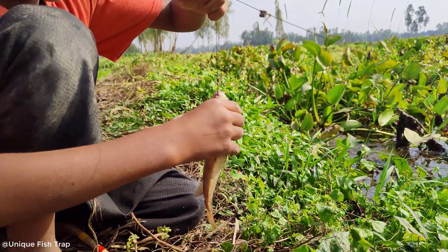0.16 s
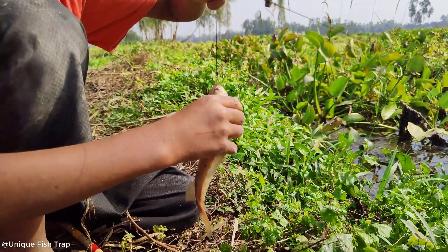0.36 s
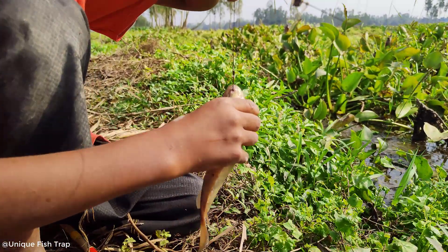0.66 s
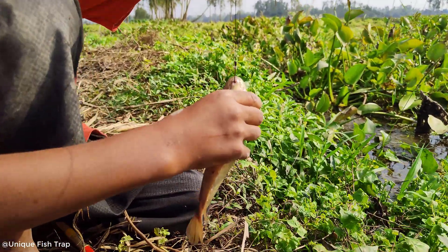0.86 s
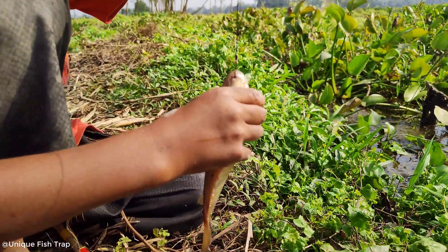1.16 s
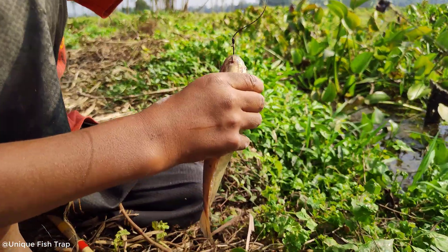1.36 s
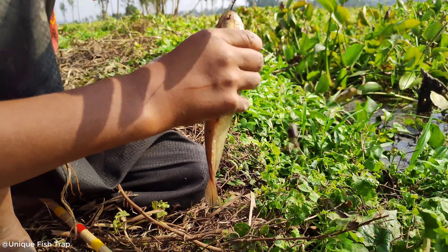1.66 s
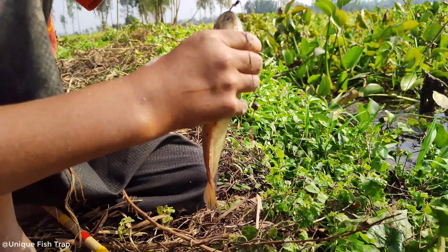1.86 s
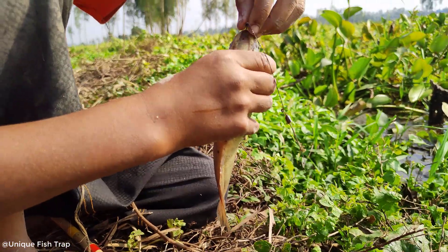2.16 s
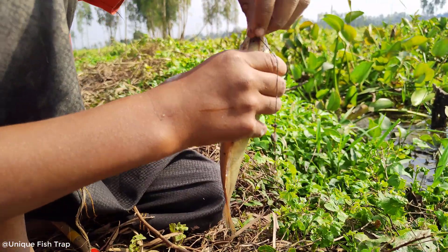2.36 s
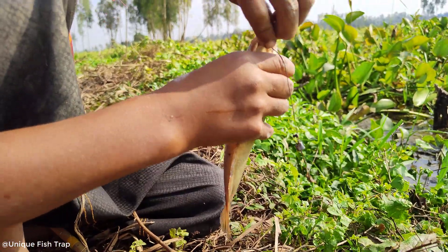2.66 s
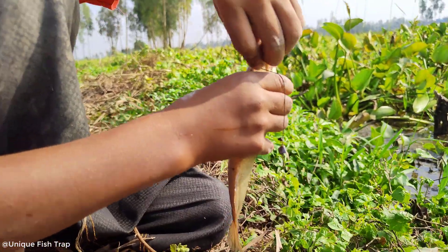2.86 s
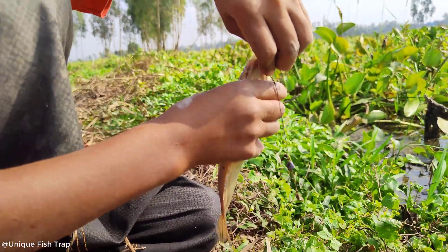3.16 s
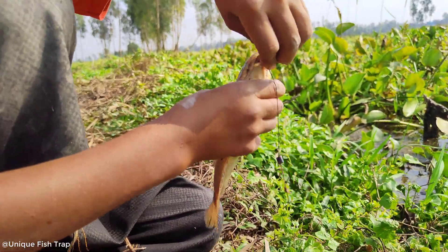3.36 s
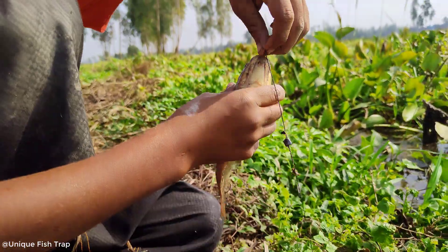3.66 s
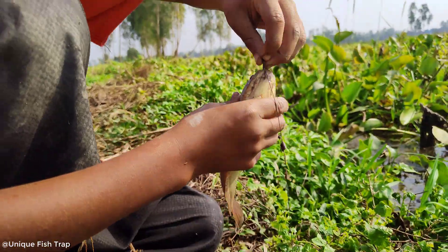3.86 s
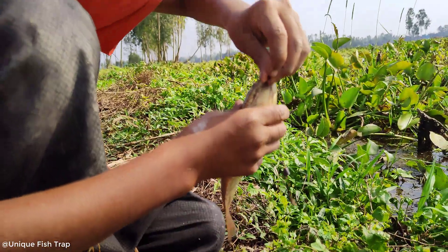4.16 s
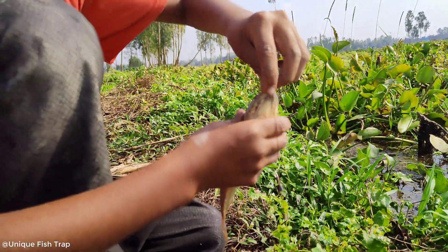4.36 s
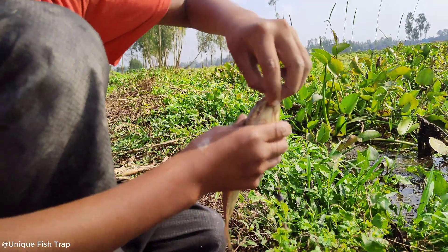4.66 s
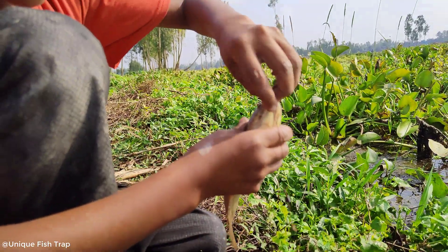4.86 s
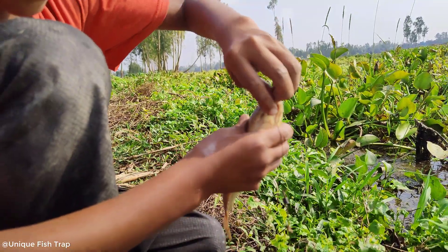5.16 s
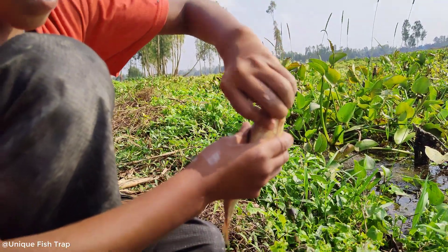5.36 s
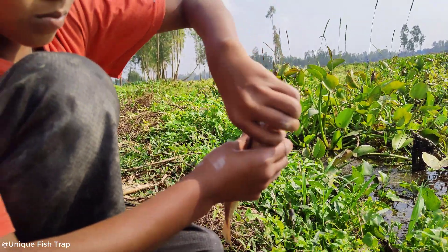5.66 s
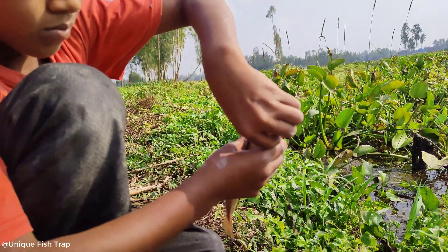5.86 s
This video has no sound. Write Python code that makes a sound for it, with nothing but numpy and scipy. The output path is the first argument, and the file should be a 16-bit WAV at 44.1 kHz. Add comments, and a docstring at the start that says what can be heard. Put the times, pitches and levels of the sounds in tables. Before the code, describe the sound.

A quiet, open marshy field with a low soft rumble, a faint wavering far motor, airy hush and a high insect buzz leaning left, its pulsing clearest around 4.5 s. Faint leaves and tiny gliding bird chirps are busiest in the first 1.4 s, with a soft whistle near 0.5 s. Up close, fingers handle a wet fish: a dull scuff at 0.4 s, light ticks at 0.4 to 0.8 s, a quick crackling rub at 1.45 s, then a wet squeaky slip at 1.9 s. Small ticks and knocks follow at 2.2 to 2.9 s, with a soft low thud at 2.5 s and a fainter one at 4 s. From 3.3 s a distant thin cluster of pulsing tones swells in hazy noise, fading after 4.2 s to weak single tones until about 5.3 s. A tick at 5.45 s precedes one sharp, dry, loud snap at 5.72 s and a tiny wet squeak.

```python
"""Hands work a hook out of a small fish at the weedy edge of a marsh: wet ticks, rustles, bumps and one sharp snap.
Ticks, knocks and squeaks are short rings, thuds are low damped rings, rubbing is flickering noise with tiny pops.
Behind lie a low noise rumble, a far motor of wavering tones, a pulsing band of insect noise and faint gliding chirps.
A thin whine of several pulsing tones, in a haze of noise, swells and fades in the distance."""
import sys
import numpy as np
from scipy import signal
from scipy.io import wavfile

SR = 44100
rng = np.random.default_rng(int(sys.argv[2]) if len(sys.argv) > 2 else 0)


def store_pcm(level_fs):
    """Save levels as 16-bit WAV."""
    pcm = np.round(np.clip(level_fs, -1, 1) * 32767).astype(np.int16)
    wavfile.write(sys.argv[1], SR, np.atleast_2d(pcm).T)


N = 264159
TIME = np.arange(N) / SR  # seconds

# How strongly the leaves stir; the far bird chatter follows the same curve.
# Each row: time in seconds, level in dB.
STIR = [(0, -66.5), (.2, -70.5), (.45, -64), (1.35, -70.5), (1.65, -73), (3.15, -74.5), (3.5, -72),
        (4.35, -71), (4.75, -71), (6, -73.5)]


def from_db(db):
    """Turn decibels into a gain."""
    return 10 ** (np.asarray(db) / 20)


def rms_one(x):
    """Scale a signal to an average strength (rms) of 1."""
    return x / np.sqrt(np.mean(x ** 2) + 1e-20)


def in_time(rows):
    """Draw each column of a table as a curve with a value at every sample."""
    seconds, *columns = np.transpose(rows)
    return [np.interp(TIME, seconds, column) for column in columns]


def at_hz(points, hz):
    """Read a value between the points of a spectrum, along a log-frequency axis."""
    point_hz, values = np.transpose(points)
    return np.interp(np.log(hz), np.log(point_hz), values)


def pan(db):
    """Left and right gains for a left-minus-right difference in dB, with a mean power of 1."""
    return rms_one(from_db(np.array([[db], [-db]]) / 2))


def drift(rate_hz):
    """Smooth random wandering of rms 1: noise through a double low-pass, made at every 40th sample."""
    step = 40
    r = np.exp(-2 * np.pi * rate_hz * step / SR)
    white = rng.standard_normal(N // step + 2002)
    slow = signal.lfilter([1], [1, -2 * r, r * r], white)[2000:]  # drop the filter's start-up
    return np.interp(np.arange(N) / step, np.arange(len(slow)), rms_one(slow))


def ring(clicks, hz, t60):
    """A resonance: each unit click starts a sine of height 1 that fades by 60 dB in t60 seconds."""
    r = np.exp(-np.log(1000) / (t60 * SR))
    w = 2 * np.pi * hz / SR
    return signal.lfilter([0, np.sin(w)], [1, -2 * r * np.cos(w), r * r], clicks + 1e-18)


def struck_rings(rows):
    """Strike one resonance per row: start in seconds, level in dB, pitch in Hz, 60 dB fade in seconds."""
    return sum(from_db(db) * ring(signal.unit_impulse(N, int(start * SR)), hz, t60)
               for start, db, hz, t60 in rows)


def held(start, length, attack, release):
    """An envelope of height 1 that builds up, holds and lets go exponentially; all in seconds."""
    before = np.maximum(start - TIME, 0) / attack
    after = np.maximum(TIME - start - length, 0) / release
    return np.exp(-np.minimum(before + after, 20))


def narrow_noise(hz, width_hz):
    """Stereo noise of rms 1 around one pitch, which may move: slow noise rides on a spinning carrier."""
    white = rng.standard_normal((2, N)) + 1j * rng.standard_normal((2, N))
    slow = signal.sosfilt(signal.butter(2, width_hz / 2, fs=SR, output="sos"), white)
    carrier = np.exp(2j * np.pi * np.cumsum(hz * np.ones(N)) / SR)
    return rms_one(np.real(slow * carrier))


def banded_noise(spectrum, patchy_db, count):
    """Stereo noise of rms 1 built from bands, each with its own level, flicker and left-right likeness."""
    # How alike the two ears' noise is. Each row: frequency in Hz, likeness from -1 to 1.
    likeness = [(60, 0.86), (130, 1), (290, 0.61), (640, -0.01), (1400, -0.091), (3100, 0.046),
                (7000, -0.3), (15000, 0.23)]
    edges = np.geomspace(spectrum[0][0], min(spectrum[-1][0], SR / 2 - 1), count + 1)
    white = rng.standard_normal((2, 2, N))
    out = 0
    for k, (low, high) in enumerate(zip(edges, edges[1:])):
        band = signal.butter(3, [low, high], "band", fs=SR, output="sos")
        mid, side = signal.sosfilt(band, white[k % 2])  # neighbours use different noise
        hz = np.sqrt(low * high)
        alike = np.clip(at_hz(likeness, hz), -1, 1)
        stereo = np.sqrt(1 + alike) * mid + np.sqrt(1 - alike) * side * [[1], [-1]]
        out = out + from_db(at_hz(spectrum, hz) + patchy_db * drift(13.9)) * stereo
    return rms_one(out)


def field_echoes(x, t60, count=60):
    """Sparse, fading reflections from ground and plants, different in each ear."""
    out = np.zeros((2, N))
    for side in range(2):
        delays = rng.uniform(0.001434, .04, count)  # seconds
        for delay, size in zip(delays, rng.normal(0, 1, count)):
            lag = int(delay * SR) + 1
            fade = np.exp(-np.log(1000) * delay / t60)
            out[side, lag:] += size * fade * x[side, :-lag]
    return out / np.sqrt(count)


def distance():
    """Low noise rumbles, wavering sines make a far motor, and soft noise makes the hush of open air."""
    # Spectrum of the rumble. Each row: frequency in Hz, relative level in dB per Hz.
    rumble_spectrum = [(13, -6), (22, 0), (59, 2.5), (125, -2.5), (146, 0.5), (221, -1.5), (241, -2),
                       (257, -16.5), (309, -12), (354, -21.5), (425, -20.5), (657, -36.5), (903, -34.5),
                       (1200, -62), (1560, -74), (2640, -120)]
    # Spectrum of the air. Each row: frequency in Hz, relative level in dB per Hz.
    air_spectrum = [(500, -5), (900, 4.5), (1300, -8), (1900, -1.5), (2800, 0.5), (3600, -6), (4600, -17.5),
                    (5600, -14), (7000, -16.5), (9000, -46), (12000, -47), (15000, -52)]
    # Tones of the far motor. Each row: middle pitch in Hz, middle rms level in dB.
    motor_tones = [(76, -61.5), (106, -64), (231, -64), (279, -68.5)]
    out = from_db(-49.5) * banded_noise(rumble_spectrum, patchy_db=2.5, count=18)
    out = out + from_db(-71) * banded_noise(air_spectrum, patchy_db=2, count=14)
    for hz, db in motor_tones:
        loudness = from_db(db + 3.3 * drift(1.6)) * np.sqrt(2)
        phase = 2 * np.pi * np.cumsum(hz + 2.042 * drift(3.57)) / SR
        out = out + loudness * np.sin(phase)
    return out


def insects():
    """A chorus of noise bands, and one nearer insect rasping in slightly uneven pulses that slide in pitch."""
    # The nearest insect. Each row: time in seconds, middle pitch in Hz, level in dB, pulse depth from 0 to 1.
    rasp_curve = [(0, 8550, -76, 0.15), (1.6, 8250, -72.5, 0.18), (2.9, 8010, -76.5, 0.3),
                  (4.0, 8050, -77, .55), (4.6, 8250, -72, .8), (5.05, 7700, -74, .7), (6, 7790, -79, .3)]
    # Spectrum of the chorus. Each row: frequency in Hz, relative level in dB per Hz.
    chorus_spectrum = [(6200, -24), (7000, -10.5), (7400, 1.5), (7750, 3), (8200, -8), (8700, -7.5),
                       (9400, -43)]
    pulses_per_s, width_hz, swing_hz = 14, 500, 140
    hz, level_db, depth = in_time(rasp_curve)
    turn = 2 * np.pi * np.cumsum(pulses_per_s * (1 + 0.076 * drift(4.7))) / SR
    pulses = rms_one(1 + depth * np.sin(turn))
    sliding_hz = hz - swing_hz * depth * np.cos(turn)
    near = from_db(level_db) * pulses * narrow_noise(sliding_hz, width_hz)
    chorus = from_db(-72.5) * banded_noise(chorus_spectrum, patchy_db=4, count=9)
    return near * pan(-9) + chorus * pan(-6)


def chatter(count=480):
    """Many tiny far chirps: short sines at random times, pitches and glides; rms 1 in all."""
    out = np.zeros(N)
    starts, lengths = rng.random(count), rng.uniform(0.02, 0.067, count)
    for when, length, (pitch, glide, loud) in zip(starts, lengths, rng.standard_normal((count, 3))):
        on = slice(int(when * N), int(when * N + length * SR))
        t = TIME[on] - TIME[on][0]
        hz = 3350 * 2 ** (.45 * np.tanh(pitch / 2)) + 4000 * glide * t
        fade = np.sin(np.pi * t / length)
        out[on] += from_db(2 * loud) * fade * np.sin(2 * np.pi * np.cumsum(hz) / SR)
    return rms_one(out)


def whistle():
    """One soft, unsteady sine that arches shallowly in pitch and grows towards its end."""
    start_s, top_s, end_s = .32, .48, .59
    top_hz, bend_hz_per_s2 = 1965, 3500
    end_db, growth_db_per_s, flicker_db = -70, 22, 2
    t = np.clip(TIME, start_s, end_s)
    hz = top_hz - bend_hz_per_s2 * (t - top_s) ** 2 + 12 * drift(53)
    gate = np.clip(np.minimum(t - start_s, end_s - t) / 0.0089, 0, 1)
    level_db = end_db + growth_db_per_s * (t - end_s) + flicker_db * drift(27)
    return gate * from_db(level_db) * np.sin(2 * np.pi * np.cumsum(hz) / SR)


def birds():
    """The whistle, clear chirps of gliding sines and far chatter, smeared by echoes from the vegetation."""
    # Clear chirps. Each row: middle in seconds, length in seconds, middle pitch in Hz,
    # glide in Hz per second, level in dB before the flicker.
    chirps = [(0.3, 0.12, 3010, 2000, -68), (0.465, 0.059, 4260, -5000, -66),
              (0.545, 0.03, 3660, 3000, -60.5), (0.575, 0.026, 1870, -1000, -64.5),
              (.66, .1, 3560, -500, -68), (.8, .09, 3800, -1500, -66), (.84, .05, 4550, 4000, -69),
              (1.27, .07, 3680, 3000, -67), (0.893, 0.04, 3260, 6000, -63), (1.135, 0.07, 2890, 500, -65),
              (1.325, .04, 3100, 8000, -65.5), (1.342, .03, 3570, 4000, -65),
              (2.352, 0.024, 2083, 8000, -61), (2.44, .08, 3490, 3000, -65.5),
              (3.52, .045, 3340, -2500, -55), (3.62, .045, 3930, 2500, -60), (4.86, .04, 2620, 2000, -65)]
    (stir_db,) = in_time(STIR)
    song = whistle() + from_db(stir_db - 6) * chatter()
    waver_hz, flicker_db = 45 * drift(60), 3 * drift(70)
    for middle, length, hz, glide, db in chirps:
        on = np.abs(TIME - middle) < length / 2
        t = TIME[on] - middle
        fade = np.cos(np.pi * t / length)
        phase = 2 * np.pi * np.cumsum(hz + glide * t + waver_hz[on]) / SR
        song[on] += from_db(db + flicker_db[on]) * fade * np.sin(phase)
    heard = song * pan(-13)
    return heard + field_echoes(heard, t60=0.26)


def rubbing_db():
    """Level of the rubbing in dB: strokes build, hold and let go, their power added to a light grip."""
    # The light, shifting grip between strokes. Each row: time in seconds, level in dB.
    grip_curve = [(0, -88), (.4, -75.5), (2.7, -82.5), (4.15, -87), (4.35, -104), (5.0, -104), (5.6, -81)]
    # Strokes of the fingers over wet skin and line.
    # Each row: start in seconds, length in seconds, level in dB, attack in seconds.
    strokes = [(0.368, 0.16, -76, .013), (0.733, 0.34, -74, .013), (1.439, .011, -58, .005),
               (1.470, 0.011, -53, .0015), (1.5, .08, -72, .013), (1.868, .008, -67, .004),
               (1.906, 0.115, -61.5, .016), (2.06, .015, -70, .008), (2.2, 0.12, -75, .013),
               (2.684, 0.023, -66.5, .01), (2.857, 0.16, -76.5, .013), (3.358, 0.014, -71, .013),
               (3.636, 0.03, -73, .013), (3.78, .014, -66, .009), (4.05, 0.067, -80, .013),
               (5.052, .02, -74, .013), (5.13, .04, -75, .013), (5.45, 0.035, -72.5, .013)]
    (grip_db,) = in_time(grip_curve)
    power = from_db(grip_db) ** 2
    for start, length, db, attack in strokes:
        power = power + (from_db(db) * held(start, length, attack, release=2 * attack)) ** 2
    return 10 * np.log10(power)


def rustles(rub_db):
    """Noise for stirring leaves, for fingers rubbing in tiny slips, and for scuffs, bumps and wet squeaks."""
    # Spectrum of the leaves. Each row: frequency in Hz, relative level in dB per Hz.
    leaf_spectrum = [(1200, -8), (2200, -3), (3000, 0), (3600, 1.5), (4400, -2.5), (5500, -16.5),
                     (7000, -54), (12000, -45)]
    # Spectrum of rubbed skin. Each row: frequency in Hz, relative level in dB per Hz.
    skin_spectrum = [(1500, -10.5), (3000, 8.5), (4100, 12.5), (5600, -10), (6700, 9), (7700, 7),
                     (9000, 0.5), (10500, 9), (12500, -15), (15500, -33)]
    # Cloth scuffs, soft bumps, brushes and wet squeaks. Each row: middle in seconds, level at the middle in dB,
    # pitch in Hz, width in Hz, time from the middle to 1/e in seconds.
    scuffs = [(0.364, -54.5, 439, 255, 0.055), (0.57, -70, 950, 400, 0.027), (1.445, -59, 6900, 600, 0.012),
              (1.541, -57, 420, 200, .01), (1.951, -60.5, 3100, 300, .008), (1.986, -66, 6650, 600, 0.08),
              (5.04, -73, 6200, 2200, .022), (5.826, -61, 6850, 500, 0.013)]
    (stir_db,) = in_time(STIR)
    leaves = from_db(stir_db) * banded_noise(leaf_spectrum, patchy_db=2.5, count=14) * pan(-4.5)
    slips = rms_one(from_db(4 * drift(220)))
    rub = from_db(rub_db) * slips * banded_noise(skin_spectrum, patchy_db=2.5, count=18) * pan(-5)
    out = leaves + rub
    for middle, db, hz, width_hz, length in scuffs:
        swell = np.exp(-((TIME - middle) / length) ** 2)
        out = out + from_db(db) * swell * narrow_noise(hz, width_hz)
    return out


def crackle(rub_db, count=16):
    """Wet skin parts in tiny pops of uneven size, each ringing briefly; a light rub's are weaker and duller."""
    hard_rub_db, pops_per_s, pop_spread_db = -62, 520, 5
    sizes = rng.choice([-1, 1], N) * from_db(pop_spread_db * np.minimum(rng.exponential(1, N), 3))
    pops = (rng.random(N) < pops_per_s / SR) * sizes
    home = rng.integers(0, count, N)  # the resonance each pop is centred on
    slack_db = np.maximum(hard_rub_db - rub_db, 0)  # how much lighter than a hard rub
    grains = 0
    for k, hz in enumerate(np.linspace(6700, 15000, count)):
        # the top is lost across this range: 3 dB, and 1.4 dB more per dB of slack
        dull_db = np.interp(hz, (11300, 13600), [0, 1]) * (3 + 1.4 * slack_db)
        strikes = pops * (np.abs(home - k) < 5) * rng.normal(0, 1, N)
        grains = grains + from_db(-dull_db) * rms_one(ring(strikes, hz, t60=.004))
    level_db = rub_db - 1.5 - .35 * slack_db
    bright = from_db(level_db) * grains / np.sqrt(count) * pan(-31)
    return bright + from_db(-15) * field_echoes(bright, t60=0.047)


def ticks():
    """Hook and fingers strike a set of resonances: crisp ticks favour the high ones, heavy ones the body."""
    # Wet ticks and the snap. Each row: start in seconds, level in dB, treble in dB (added once above
    # 5500 Hz, twice above 12000 Hz), dull body in dB, left-minus-right pan in dB.
    tick_rows = [(0.436, -41, -13.5, -24, 35), (0.538, -50.5, -3, 0, -10), (0.7374, -50, -2, -10, 3),
                 (0.83, -51, -1, -17, -8), (1.441, -54, -2, -18, -17), (1.4677, -52, 9.5, -20, -20),
                 (1.472, -60, 13, -20, -25), (2.022, -60, 0, -20, -18), (1.904, -44.5, -19, -28, -1),
                 (1.912, -67, -17, -28, -11), (2.194, -59, 4.5, -15, -15), (2.223, -48.5, -10, 12, -22),
                 (2.349, -49, -2.5, -5, 0), (2.58, -56, -4, -7, -1), (2.643, -54.5, 16, -15, -7.5),
                 (2.882, -59, 9.5, -17, 1.5), (4.108, -53, 0.5, -20, -8), (5.456, -47.5, -1.5, -22, -4),
                 (5.723, -39, -33, 5.5, -4), (5.7244, -26, -12, -2.5, -12), (5.7258, -49.5, 14.5, 15, -5.5)]
    # What a tick rings with. Each row: pitch in Hz, relative level in dB, 60 dB fade in seconds.
    tick_modes = [(2800, -7, 0.0073), (3135, -4, 0.016), (4070, 6.5, 0.0041), (5000, -38, 0.001),
                  (6590, -2, 0.011), (8100, 0, 0.0044), (9100, 0.5, 0.011), (11100, -7, 0.009),
                  (12300, -24, 0.013), (14500, -25, 0.0085)]
    # Its dull body. Each row: pitch in Hz, relative level in dB, 60 dB fade in seconds.
    body_modes = [(450, -9.5, 0.019), (890, -13, 0.01), (1460, -11, 0.0023)]
    start, level_db, treble_db, body_db, pan_db = np.transpose(tick_rows)
    at = np.round(start * SR).astype(int)
    sides = np.hstack([pan(p) for p in pan_db])
    modes = [(mode, treble_db * np.digitize(mode[0], (5500, 12000))) for mode in tick_modes]
    modes += [(mode, body_db) for mode in body_modes]
    out = 0
    for k, ((hz, db, t60), colour_db) in enumerate(modes):
        uneven_db = rng.normal(0, .8, (len(at), 2)).T
        clicks = np.zeros((2, N))
        clicks[:, at] = sides * from_db(level_db + db + colour_db + uneven_db)
        out = out + (-1) ** k * ring(clicks, hz, t60)
    # the hands are nearer the right ear, so the left hears them 17 samples later
    out[0] = np.roll(out[0], 17)
    return out + from_db(-9) * field_echoes(out, t60=.07)  # plants add a short tail


def knocks_and_squeaks():
    """Low knocks and short wet squeaks from the handling; each rings briefly at one pitch."""
    # Knocks and squeaks. Each row: start in seconds, level in dB before panning, pitch in Hz,
    # 60 dB fade in seconds.
    ring_rows = [(1.369, -54, 880, 0.018), (1.474, -48.5, 4100, 0.067), (1.885, -54.5, 3270, 0.088),
                 (1.907, -47, 3370, 0.033), (1.913, -45, 3335, 0.029), (2.2229, -48, 710, 0.016),
                 (3.317, -55, 1800, .008), (3.799, -52.5, 905, 0.019)]
    near = struck_rings(ring_rows) * pan(-14)
    return near + from_db(-7) * field_echoes(near, t60=.07)


def thuds():
    """Weight shifts on soft ground: low damped rings, with a low-pass that softens their onset."""
    # Thuds. Each row: start in seconds, level in dB before the low-pass, pitch in Hz, 60 dB fade in seconds.
    thud_rows = [(2.474, -34, 220.5, 0.13), (3.985, -40.5, 143, 0.2)]
    return signal.sosfilt(signal.butter(2, 330, fs=SR, output="sos"), struck_rings(thud_rows))


def far_tone(hz, pan_db):
    """A tone that throbs, wavers and flutters in the moving air, reaching the ears slightly apart."""
    throb_per_s, throb_db, waver_hz = 15, 1.5, 9
    flutter_per_s, flutter_depth = 35, .3
    phase = 2 * np.pi * (np.cumsum(hz + waver_hz * drift(throb_per_s)) / SR + rng.random())
    tone = from_db(throb_db * drift(throb_per_s)) * np.exp(1j * phase)
    ears = []
    for lag in (0, 2.03):  # radians
        flutter = 1 + flutter_depth * (drift(flutter_per_s) + 1j * drift(flutter_per_s))
        ears.append(np.real(np.exp(1j * lag) * tone * flutter))
    return pan(pan_db) * rms_one(np.array(ears))


def whine():
    """A cluster of far, gently pulsing tones that hold and swell in turn, in a haze of noise."""
    # The haze. Each row: start in seconds, length in seconds, level in dB before panning.
    haze_rows = [(3.36, .24, -64.5), (3.65, .42, -71)]
    # The tones. Each row: pitch in Hz, left-minus-right pan in dB.
    tones = [(2590, -5), (2993, -2), (3156, -3), (3461, -10), (3619, -10), (3736, -10), (3950, -3),
             (4315, -6)]
    # Held notes and the swells on them, the last ones thin and alone.
    # Each row: start in seconds, length in seconds, tone in Hz, relative level in dB.
    swells = [(3.245, .9, 3156, -64.5), (3.27, .91, 3461, -70), (3.26, .88, 3619, -70),
              (3.27, .93, 3736, -72), (3.335, .025, 3156, -55), (3.33, .52, 2993, -67),
              (3.4, .45, 3156, -61), (3.41, .15, 2993, -57), (3.42, .39, 3461, -66), (3.42, .19, 2590, -70),
              (3.42, .72, 2590, -75.5), (3.45, .7, 4315, -83), (3.92, .21, 2993, -72.5),
              (3.94, .08, 3619, -65), (3.95, .08, 3736, -63), (4.26, .11, 3736, -78),
              (4.44, .68, 3950, -75), (4.59, .06, 3950, -70.5), (4.85, .11, 3950, -71.5),
              (5.06, .2, 2993, -71)]
    attack_s, release_s = .036, .055
    pulses_per_s, pulse_depth = 17, .4
    haze = sum(from_db(db) * held(start, length, attack_s, release_s) for start, length, db in haze_rows)
    out = haze * narrow_noise(3300, width_hz=1250) * pan(-8)
    for hz, pan_db in tones:
        power = sum((from_db(db) * held(start, length, attack_s, release_s)) ** 2
                    for start, length, tone_hz, db in swells if tone_hz == hz)
        turn = 2 * np.pi * np.cumsum(pulses_per_s * (1 + .25 * drift(2))) / SR
        pulses = 1 + pulse_depth * np.sin(turn)
        out = out + from_db(2) * np.sqrt(power) * pulses * far_tone(hz, pan_db)
    return out


def scene():
    """Add the far sounds and the near handling; rustles and crackle share one rubbing level."""
    rub_db = rubbing_db()
    far = distance() + insects() + birds()
    near = rustles(rub_db) + crackle(rub_db) + ticks() + knocks_and_squeaks() + thuds()
    return far + near + whine()


def record(dry):
    """Cut everything above 15700 Hz steeply with a low-pass."""
    return signal.sosfilt(signal.ellip(10, .1, 80, 15700, fs=SR, output="sos"), dry)


dry = scene()
out = record(dry)
store_pcm(out)
```